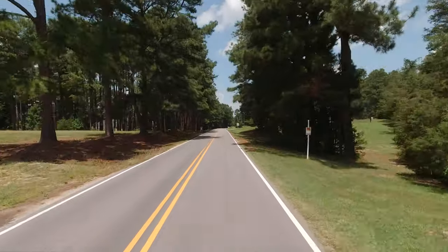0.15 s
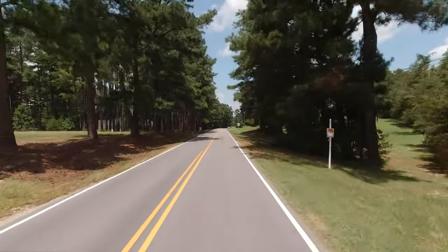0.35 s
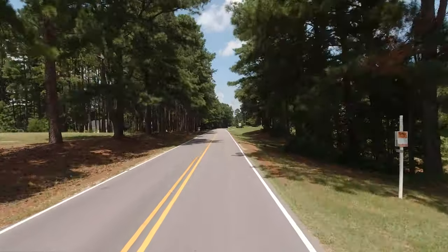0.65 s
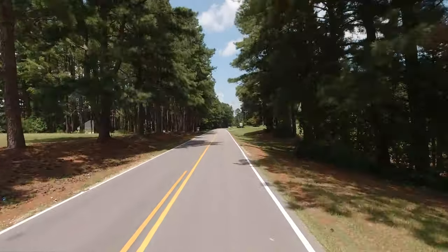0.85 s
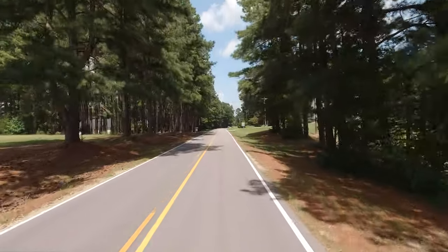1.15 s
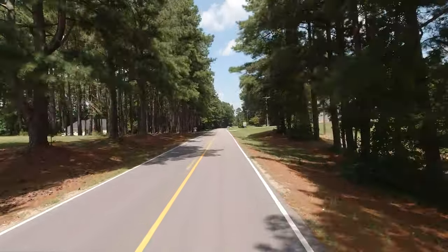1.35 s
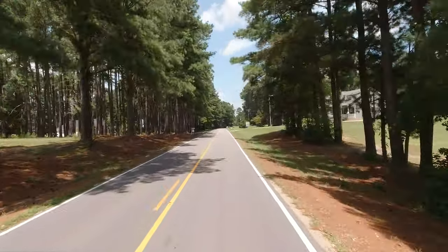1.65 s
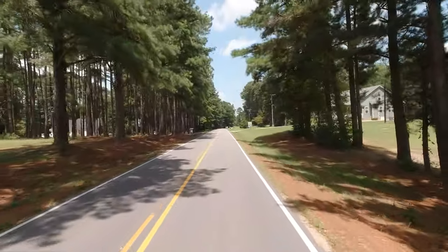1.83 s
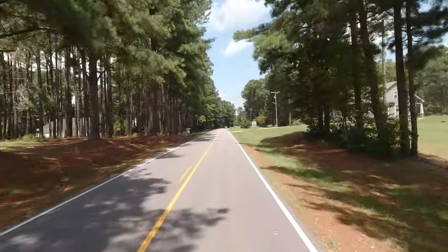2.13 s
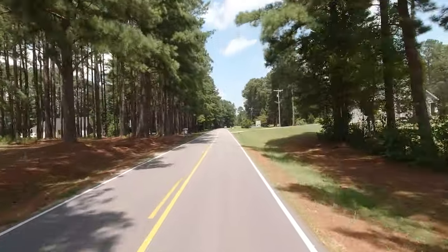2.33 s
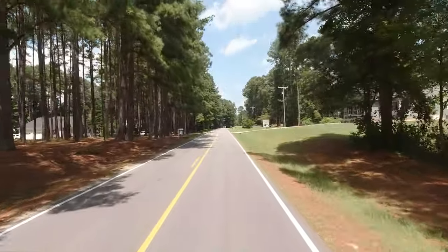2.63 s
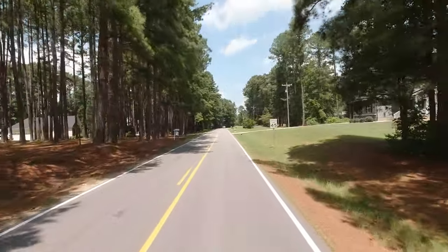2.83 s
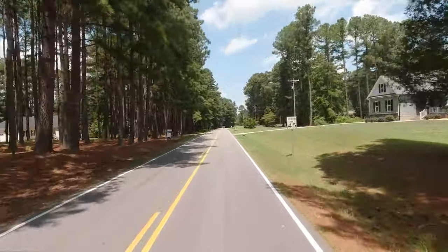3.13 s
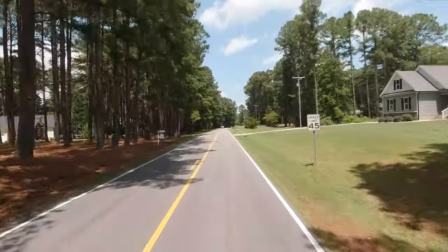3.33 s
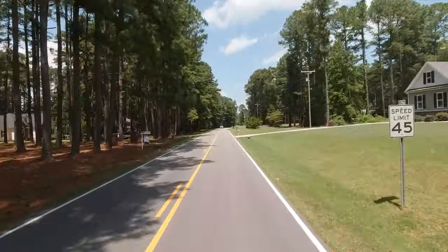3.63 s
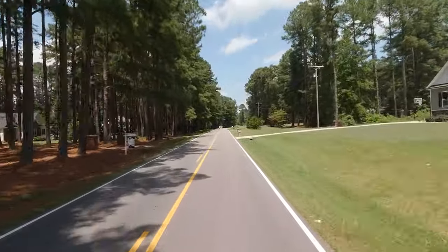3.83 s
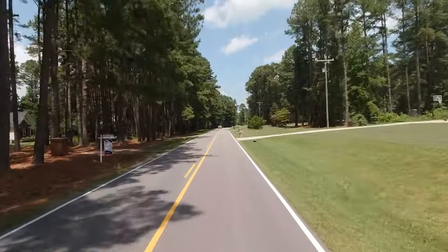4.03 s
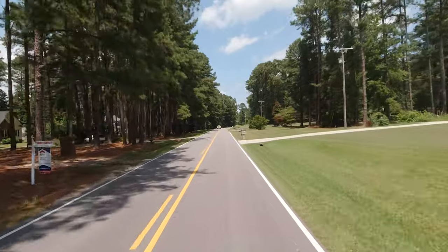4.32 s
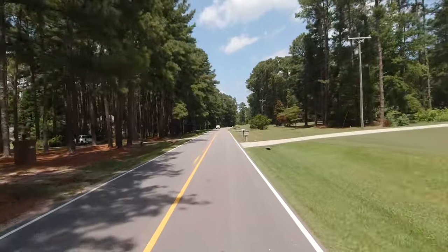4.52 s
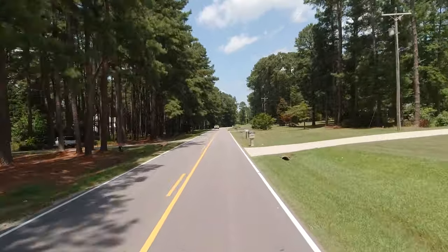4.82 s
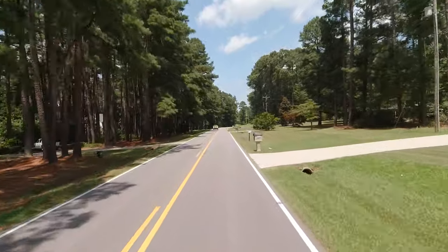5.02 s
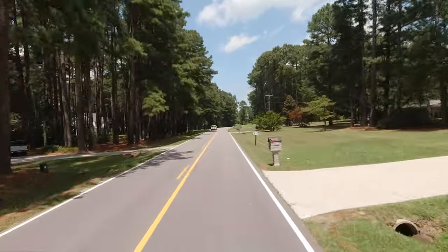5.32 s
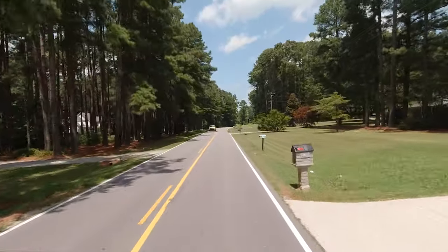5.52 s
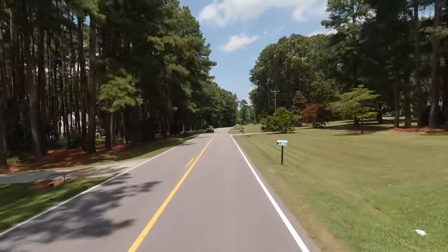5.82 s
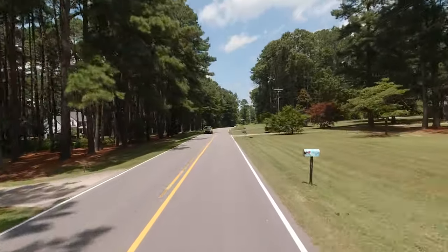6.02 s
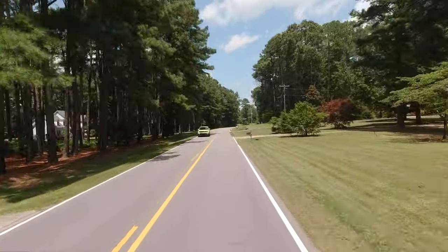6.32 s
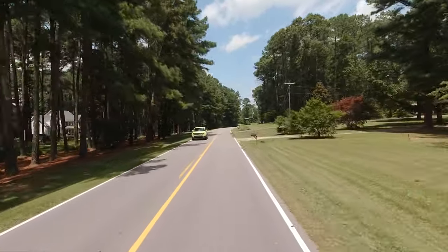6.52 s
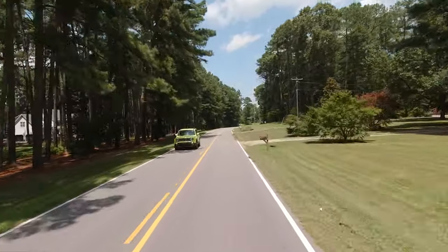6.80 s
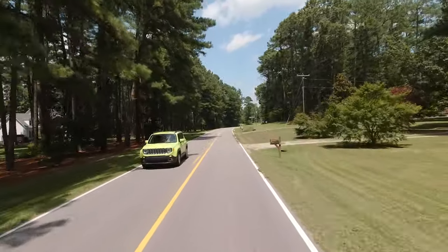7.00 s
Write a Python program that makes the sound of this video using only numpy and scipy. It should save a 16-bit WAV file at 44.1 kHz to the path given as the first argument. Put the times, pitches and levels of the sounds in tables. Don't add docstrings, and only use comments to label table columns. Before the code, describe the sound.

A seven-second stereo take inside a vehicle at steady speed on a country road, windows open. Throughout, the cabin air booms near 40 Hz in irregular throbs, several a second, breaking off and restarting, with heavy rumble from floor, axle and body. Quieter, wide tyre roar, a faint tread hum and thin fluttering wind hiss lie above, with soft drones and muffled knocks from doors and window frames. A dull grit tick lands at 0.6 s, a faint ringing one at 2.1 s, and the clearest at 3.7 s. Very faint high trim squeaks appear around 2.5-2.8 s and 3.7-4 s, mostly right. From about 5 s road and wind noise strengthen slightly; tiny bright ticks come at 5.5 and 6.5 s. In the last second an oncoming car's tyre hiss swells gently, still approaching as the sound ends around 7 s.

```python
import sys
import numpy as np
from scipy import signal
from scipy.fft import rfft, irfft, next_fast_len
from scipy.io import wavfile
from scipy.ndimage import uniform_filter1d, map_coordinates

SR = 44100
rng = np.random.default_rng(int(sys.argv[2]) if len(sys.argv) > 2 else 0)


def unload_wav(signal):
    wavfile.write(
        sys.argv[1],
        SR,
        np.round(np.clip(np.atleast_2d(signal).T, -1, 1) * 32767).astype(np.int16),
    )


def level_to_linear(level):
    exponent = np.asarray(level, float) / 20
    return 10 ** exponent


N = 315756

# (start [s], length [s], pitch [Hz], level [dB])
THROBS = [(-0.13, 0.2695, 37.62, -19.5), (0.24, 0.24, 38.1, -22), (0.429, 0.14, 37.2, -19.5),
          (0.581, 0.13, 40, -27), (0.722, 0.17, 42.97, -21.5), (0.964, 0.11, 39.8, -20.0),
          (1.073, 0.15, 38.7, -17), (1.239, 0.14, 40.3, -17), (1.447, 0.4955, 38.07, -19),
          (2.244, 0.13, 38.56, -16.5), (2.451, 0.2, 41.22, -20), (2.659, 0.15, 43.13, -26.5),
          (3.072, 0.37, 39.42, -20), (3.307, 0.23, 39.13, -18.5), (3.529, 0.22, 40.76, -20),
          (3.751, 0.3, 39.26, -20), (4.03, 0.25, 38.98, -18.5), (4.225, 0.16, 39.86, -15.5),
          (4.363, 0.18, 40.53, -19.5), (4.591, 0.18, 35.68, -23.5), (4.778, 0.23, 37.73, -26.5),
          (5.008, 0.24, 42.48, -21), (5.215, 0.23, 40.88, -24.5), (5.375, 0.12, 37.96, -21),
          (5.51, 0.29, 37.62, -20.5), (5.74, 0.18, 36.9, -17.5), (5.895, 0.056, 37.6, -22.5),
          (6.04, 0.17, 43.04, -25), (6.229, 0.29, 42.93, -27.5), (6.369, 0.32, 40.25, -21),
          (6.574, 0.17, 40.2, -16.5), (6.741, 0.097, 41.6, -17), (6.846, 0.19, 42.6, -26.5),
          (6.96, 0.18, 43.6, -20.5)]
BOOM_BREAKS = [0.213, 0.44, 0.569, 0.705, 0.88, 1.222, 1.349, 1.948, 2.252, 2.413, 2.882, 3.063, 3.54,
               3.755, 4.066, 4.361, 4.794, 5.408, 5.893, 6.027, 6.34, 6.732, 6.83, 7.13]

# (time [s], length [s], level [dB])
BUMPS = [(0.04, 0.071, -29), (0.53, 0.11, -23), (0.84, 0.087, -29.5), (1.53, 0.13, -24),
         (1.91, 0.14, -28.5), (2.21, 0.087, -24), (2.6, 0.088, -29), (2.74, 0.031, -21),
         (3.1, 0.035, -23.5), (3.54, 0.08, -22.5), (3.71, 0.064, -20), (4.02, 0.061, -36),
         (4.32, 0.11, -29), (4.56, 0.11, -31.5), (4.68, 0.045, -21.5), (4.79, 0.045, -34),
         (5.01, 0.26, -26.5), (5.58, .08, -33.5), (5.93, .08, -24.5), (6.17, .08, -21), (6.35, 0.061, -19),
         (6.57, 0.079, -24.5), (6.78, 0.3, -27), (7.0, 0.11, -24)]
# (frequency [Hz], density [dB per Hz])
SHAKE_SPECTRUM = [(25, -40), (40, -14), (46, -3), (50, 1), (54, -2), (58, -6), (64, -11), (80, -40),
                  (160, -120)]
# (time [s], length [s], level [dB])
DIPS = [(0.34, 0.093, -29), (0.49, 0.14, -30), (1.77, 0.12, -32), (4.01, 0.07, -33), (4.24, 0.1, -28),
        (4.69, 0.053, -26), (5.12, 0.14, -34.5), (5.33, 0.1, -24.5), (5.48, 0.079, -24), (5.7, 0.07, -30),
        (6.19, 0.08, -38), (6.36, 0.18, -29.5), (6.93, 0.07, -29), (7.08, 0.071, -30)]
# (frequency [Hz], density [dB per Hz])
HEAVE_SPECTRUM = [(6, -40), (12, -14), (18, -4), (23, -5), (29, -6), (32.5, 1), (35, -6), (50, -45),
                  (100, -120)]
# (time [s], length [s], level [dB])
TAR_PATCHES = [(0.24, 0.092, -30.5), (0.54, 0.037, -30.5), (1.08, 0.14, -30.5), (1.44, 0.15, -32),
               (1.8, 0.17, -32.5), (2.16, 0.25, -27), (2.94, 0.12, -26.5), (3.18, 0.19, -29.5),
               (3.66, 0.39, -29), (3.84, 0.11, -30.5), (4.08, 0.11, -35.5), (4.56, 0.2, -21),
               (4.86, 0.18, -27.5), (5.16, 0.22, -35), (5.58, 0.13, -25), (5.82, 0.16, -23.5),
               (6.36, 0.2, -27.5), (6.66, 0.082, -36.5)]
# (frequency [Hz], density [dB per Hz])
RUMBLE_SPECTRUM = [(35, -40.5), (58, -8.5), (70, -2), (82, 1.5), (95, -1.5), (110, -15), (200, -120)]
# (time [s], length [s], level [dB])
RUTS = [(0.42, 0.066, -33.5), (0.78, 0.16, -29.5), (1.26, 0.28, -30), (1.74, 0.13, -28.5),
        (2.46, 0.28, -32.5), (2.76, 0.1, -28.5), (3.12, 0.16, -28.5), (3.54, 0.26, -30.5),
        (3.72, 0.043, -30), (3.96, 0.13, -26.5), (4.14, 0.055, -29), (4.38, 0.15, -28), (4.98, 0.16, -33.5),
        (5.16, 0.063, -22.5), (5.34, 0.15, -30.5), (5.82, 0.21, -28.5), (6.24, 0.11, -26),
        (6.6, 0.22, -24.5), (6.96, 0.11, -23.5)]
# (frequency [Hz], density [dB per Hz])
AXLE_SPECTRUM = [(50, -120), (88, -18.5), (102, -2.5), (122, -1), (134, -3.5), (150, -18.5), (300, -120)]
# (time [s], length [s], level [dB])
RIDGES = [(0.18, 0.045, -31.5), (0.3, 0.05, -31), (0.6, 0.07, -29.5), (0.78, 0.036, -28),
          (1.08, 0.18, -33.5), (1.74, 0.11, -30), (2.16, 0.09, -30.5), (2.7, 0.13, -35), (3.48, 0.31, -34),
          (3.84, 0.2, -30), (4.44, 0.23, -36), (4.56, 0.1, -28), (4.86, 0.12, -28.5), (5.04, 0.063, -32.5),
          (5.7, 0.3, -27.5), (6.24, 0.06, -27.5), (6.42, 0.076, -31), (6.66, 0.23, -34.5)]
# (frequency [Hz], density [dB per Hz])
PAN_SPECTRUM = [(70, -120), (125, -21.5), (145, -1.5), (168, -0.5), (189, -2.5), (203, -14), (260, -31.5),
                (500, -120)]
# (time [s], level [dB])
COARSENESS = [(0, -33), (0.5, -37.5), (1.5, -33), (1.75, -34.5), (2.0, -38.5), (2.2, -34.5), (3.0, -34.5),
              (3.5, -33), (3.85, -36.5), (4.05, -33), (4.4, -37.5), (5.2, -30.5), (5.5, -33), (5.72, -30),
              (6.0, -29.5), (6.3, -32.5), (6.9, -27), (7.16, -34)]

# (time [s], level [dB])
TYRE_BITE = [(0, -53.5), (.6, -52.5), (.9, -53), (1.8, -51.5), (2.05, -52), (2.4, -52), (2.9, -51.5),
             (3.48, -51), (4.0, -51.5), (4.3, -51), (4.75, -51.5), (5.05, -50.5), (5.25, -50), (5.65, -49),
             (5.85, -50), (6.15, -50), (6.45, -50.5), (7.16, -49)]
# (frequency [Hz], density [dB per Hz])
ROAR_SPECTRUM = [(150, -35), (250, -4), (460, -7), (600, -9.5), (850, -11), (1170, -20), (1700, -15.5),
                 (2400, -26.5), (3500, -31.5), (4200, -36.5), (4600, -37), (5000, -43), (5700, -47.5),
                 (6500, -55), (9000, -87.5)]
# (time [s], strength [dB], left minus right [dB])
WINDOW_AIR = [(0.08, -78, 2.5), (0.19, -80, 1.5), (0.29, -78, 2), (2.11, -78, 2), (3.65, -76, 3),
              (3.73, -76, 3.5), (4.43, -76, 1.5), (4.64, -77, 3.5), (5.27, -75.5, 1.5), (5.34, -73.5, 4),
              (6.2, -73, 1.5), (6.3, -72, 1), (6.38, -74, 3.5), (6.55, -71.5, 2.5), (6.9, -71.5, 0.5),
              (7.08, -74, 3.5)]
# (frequency [Hz], density [dB per Hz])
HISS_SPECTRUM = [(3000, -35), (5000, -4), (6700, -4), (8500, -1.5), (9300, -2), (10500, -6), (11400, -4.5),
                 (12000, -6), (12700, -10), (13700, -11.5), (14300, -14), (15700, -16), (16500, -39.5)]

# (time [s], length [s], level [dB])
SEAMS = [(0.3, 0.1, -41.5), (0.7, 0.16, -44.5), (1.12, 0.069, -48), (1.38, 0.066, -39), (1.76, 0.091, -41),
         (2.1, 0.092, -41), (2.33, 0.059, -42), (2.7, 0.23, -44), (3.05, 0.23, -41), (3.4, 0.12, -46),
         (3.62, 0.074, -35), (4.05, 0.2, -36.5), (4.55, 0.078, -43.5), (4.98, 0.067, -38),
         (5.35, 0.35, -40.5), (5.7, 0.16, -44.5), (6.05, 0.08, -37), (6.3, 0.17, -38), (6.55, 0.16, -37.5),
         (6.8, 0.075, -41.5), (7.03, .1, -40)]
# (frequency [Hz], density [dB per Hz])
DOOR_SPECTRUM = [(150, -40.5), (205, -0.5), (235, -1), (275, -3.5), (300, -11.5), (400, -51), (730, -120)]
# (time [s], length [s], level [dB])
CRACKS = [(0.36, 0.1, -41.5), (1.32, 0.25, -44.5), (1.74, 0.25, -38.5), (2.22, 0.27, -43),
          (2.76, 0.067, -46), (2.94, 0.082, -41.5), (3.12, 0.13, -45.5), (3.54, 0.082, -49),
          (3.78, 0.04, -51), (4.08, 0.22, -39.5), (4.56, 0.095, -41.5), (4.98, 0.27, -48),
          (5.46, 0.18, -36), (5.88, 0.2, -46.5), (6.42, 0.043, -43.5), (6.6, 0.1, -48.5)]
# (frequency [Hz], density [dB per Hz])
FRAME_SPECTRUM = [(150, -120), (260, -17.5), (295, 1), (330, 0.5), (370, -11.5), (430, -25), (730, -120)]

# (frequency [Hz], density [dB per Hz])
TREAD_SPECTRUM = [(440, -59.5), (520, -7.5), (545, 1), (572, -5.5), (680, -50.5), (800, -8.5), (828, -4.5),
                  (855, 0), (885, -3.5), (1200, -69), (1670, -25), (1715, -8.5), (1755, -20.5),
                  (2300, -120)]
# (frequency [Hz], density [dB per Hz])
ONCOMING_SPECTRUM = [(700, -24), (1500, 0.5), (3000, 5.5), (5000, -10), (9000, -22), (13000, -23),
                     (16000, -52.5)]
# (time [s], level [dB], pitch [Hz], decay to -60 dB [cycles])
GRIT = [
    (0.598, -32, 780, 9),
    (2.137, -33, 860, 70),
    (3.6568, -24, 900, 9),
    (5.4645, -41, 2600, 9),
    (6.5401, -38, 3200, 18),
]
# (time [s], half length [s], pitch [Hz], level [dB])
SQUEAKS = [(2.52, .17, 9330, -87), (2.78, .07, 9300, -85), (2.8, .07, 9560, -86), (2.8, .08, 8200, -87),
           (3.72, .09, 8500, -83), (3.79, .13, 8090, -81), (3.74, .08, 9060, -79), (3.9, 0.14, 9140, -80.5),
           (3.74, .08, 8620, -85), (3.73, .05, 7020, -85), (3.89, .08, 7560, -81), (3.93, .08, 8050, -86)]

# (centre [Hz], width [Hz], left gain [dB], right gain [dB])
CABIN_MODES = [(89, 11, -0.5, -1.5), (126, 18, -1, 4.5), (132, 5.4, -1, -4.5), (184, 18, -4.5, -1.5),
               (274, 25, 1.5, -4), (376, 19, -4, 4), (420, 18, -1.5, 1.5), (455, 22, -2, -5.5),
               (560, 25, -5, 1.5), (643, 25, 4.5, -2), (713, 16, 6.5, 1), (930, 25, 1.5, -3.5),
               (450, 170, 2, 0.5), (570, 54, 2.5, 2.5), (630, 24, -4.5, -4.5), (730, 31, -2.5, -3),
               (810, 65, 2, -1.5), (897, 31, -4.5, -5.5), (958, 35, -2, 6.5), (1043, 94, -3.5, 6),
               (1103, 51, 3.5, 2), (1190, 30, -1.5, -4), (1292, 100, 4, 3), (1370, 140, -1.5, -0.5),
               (1442, 37, 3, 5), (1756, 33, 5.5, -6), (1779, 115, -8.5, -7.5), (1828, 80, 4.5, -2)]
# (frequency [Hz], correlation [0..1])
LIKENESS = [(22, 0.69), (40, 0.91), (52, 1), (65, 1), (120, 0.89), (180, 0.83), (250, 0.56), (320, 0.57),
            (480, 0.43), (590, 0.16), (700, 0.37), (870, 0.14), (1200, 0.1), (1550, 0.37), (2500, 0.074),
            (6000, 0.067)]
# (frequency [Hz], lead [radians])
LEFT_LEAD = [(0, 0), (50, .03), (70, .2), (185, .23), (300, .9), (385, 2.4), (760, 3.3), (1120, 4.6),
             (1380, 8.2), (1640, 10.4), (2000, 15.9), (2700, 16.6), (4650, 22)]
# (frequency [Hz], left minus right [dB])
BALANCE = [(35, 0.9), (52, 0), (70, 10.5), (90, -0.5), (115, 5.5), (185, 6.5), (270, -1.5), (330, 1.5),
           (460, 1.5), (700, 1), (1060, 5.5), (1600, 7), (2750, 2), (4400, 5.5), (9000, 3)]


def boom():
    idle_db, idle_hz = -29, 41.03
    stretch, flat_top = 1.14, 0.96
    t = np.arange(N) / SR
    eddies_hz = 1.504 * wobble(16)
    power = level_to_linear(2 * (idle_db + 2.1 * wobble(11)))
    pull = power * idle_hz
    for start, length, hz, db in THROBS:
        phase = np.clip((t - start - length / 2) / (length * stretch), -.5, .5)
        bell = np.abs(np.cos(np.pi * phase)) ** (2 * flat_top)
        throb = level_to_linear(2 * db + 6.5) * bell
        power = power + throb
        pull = pull + hz * throb
    pitch_hz = pull / power + eddies_hz
    level = np.sqrt(power) * level_to_linear(0.68 * wobble(27))
    return level * breaks() * np.cos(2 * np.pi * np.cumsum(pitch_hz) / SR)


def breaks():
    break_s = .014
    until = np.array(BOOM_BREAKS)[:, None] - np.arange(N) / SR
    return np.prod(np.tanh(until / break_s), axis=0)


def body():
    road_db, = curves(COARSENESS)
    swing_db = 0.73 * (road_db - road_db.mean())
    shake = swells(BUMPS, -29.5) * rush(SHAKE_SPECTRUM, steady=1.0)
    heave = level_to_linear(1.5) * swells(DIPS, -32) * rush(HEAVE_SPECTRUM, steady=0.75)
    rumble = level_to_linear(-3.5) * swells(TAR_PATCHES, -30.5 + swing_db) * rush(RUMBLE_SPECTRUM, steady=0.85)
    axle = level_to_linear(-3.0) * swells(RUTS, -32 + swing_db) * rush(AXLE_SPECTRUM, steady=0.31)
    pan = level_to_linear(-3.0) * swells(RIDGES, road_db + 1.5) * rush(PAN_SPECTRUM, steady=0.94)
    return breaks() * (shake + heave) + rumble + axle + pan


def airflow():
    air_db, pan_db = curves(WINDOW_AIR)
    bite_db, = curves(TYRE_BITE)
    roar_db = -43.5 + 0.87 * (bite_db - bite_db.mean())
    lean = level_to_linear(np.outer([.5, -.5], pan_db - pan_db.mean()))
    flutter = wobble(60)
    roar_level = level_to_linear(roar_db + 5.0 + 0.25 * flutter + 0.38 * wobble(25))
    roar = roar_level * patchy(rush(ROAR_SPECTRUM), depth_db=0.22)
    hiss_level = level_to_linear(air_db + 3.5 + 0.84 * flutter + 0.5 * wobble(45))
    hiss = hiss_level * patchy(rush(HISS_SPECTRUM), depth_db=0.5)
    return lean * (roar + hiss)


def panels():
    doors = swells(SEAMS, -42) * rush(DOOR_SPECTRUM, steady=0.51)
    frames = level_to_linear(-3.5) * swells(CRACKS, -46.5) * rush(FRAME_SPECTRUM, steady=0.78)
    return doors + frames


def tread():
    bite_db, = curves(TYRE_BITE)
    hum_db = -48.5 + 0.65 * (bite_db - bite_db.mean()) + 0.8 * wobble(6.7)
    return level_to_linear(hum_db) * rush(TREAD_SPECTRUM, steady=0.6)


def oncoming():
    pass_s, closing_m_per_s, lane_m = 7.58, 40, 4.4
    ahead_m = closing_m_per_s * (pass_s - np.arange(N) / SR)
    distance_m = np.hypot(ahead_m, lane_m)
    return level_to_linear(-45.5) * lane_m / distance_m * rush(ONCOMING_SPECTRUM)


def grit():
    out, t = np.zeros(N), np.arange(SR // 20) / SR
    for start, db, hz, cycles in GRIT:
        decay = level_to_linear(db - 60 * t * hz / cycles)
        attack = 1 - np.exp(-2 * hz * t)
        out[round(start * SR):][:len(t)] += decay * attack * np.sin(2 * np.pi * hz * t)
    return out


def trim():
    t, out = np.arange(N) / SR, np.zeros(N)
    unrest_hz = 15 * wobble(30)
    unrest = 2 * np.pi * np.cumsum(unrest_hz) / SR
    for centre, length, hz, db in SQUEAKS:
        near = np.abs(t - centre) < length
        fade = np.cos(np.pi / 2 * (t[near] - centre) / length)
        out[near] += level_to_linear(db) * np.sin(2 * np.pi * hz * t[near] + unrest[near]) * fade
    return out * level_to_linear([[-8], [3]])


def ports(x):
    m = next_fast_len(N + 8192)
    hz = np.fft.rfftfreq(m, 1 / SR)
    rings_db = np.zeros((2, len(hz)))
    for centre, width, left, right in CABIN_MODES:
        rings_db += np.outer([left, right], 1 / (1 + (2 * (hz - centre) / width) ** 2))
    half = np.array([[.5], [-.5]])
    gain = level_to_linear(rings_db + half * along(BALANCE, hz))
    phase = np.exp(1j * half * np.interp(hz, *np.transpose(LEFT_LEAD)))
    slow_cut = hz ** 2 / np.hypot(hz ** 2, 16.0 ** 2)
    padded = np.pad(x, [(0, 0), (4096, 4096)], 'reflect')
    return irfft(rfft(padded, m) * gain * phase * slow_cut, m)[:, 4096:][:, :N]


def rush(spectrum, steady=0):
    m = next_fast_len(N)
    hz = np.fft.rfftfreq(m, 1 / SR)
    turn = np.arccos(np.clip(along(LIKENESS, hz), 0, 1)) / 2
    noise = rfft(rng.standard_normal((2, m))) * level_to_linear(along(spectrum, hz))
    mid, side = noise * [np.cos(turn), np.sin(turn)]
    out = irfft([mid + side, mid - side], m)[:, :N]
    swell = uniform_filter1d(np.sum(out ** 2, axis=0), size=SR // 16)
    return unit(out / np.abs(swell + 1e-20) ** (steady / 2))


def patchy(x, depth_db):
    z = signal.stft(x, nperseg=512)[2]
    field = rng.standard_normal(z.shape[1:])
    field = uniform_filter1d(field, size=6, axis=0)
    field = uniform_filter1d(field, size=14, axis=1)
    return signal.istft(z * level_to_linear(depth_db * unit(field)), nperseg=512)[1][:, :N]


def swells(rows, base_db):
    t = np.arange(N) / SR
    power = level_to_linear(2 * base_db)
    for centre, width, db in rows:
        power = power + level_to_linear(2 * db) * np.exp(-np.log(16) * ((t - centre) / width) ** 2)
    return np.sqrt(power)


def wobble(rate):
    knots = rng.standard_normal(int(N * rate / SR) + 4)
    return map_coordinates(knots, [np.arange(N) * rate / SR])


def curves(rows):
    s, *cols = np.transpose(rows)
    t = np.arange(N) / SR
    return [uniform_filter1d(np.interp(t, s, c), size=SR // 80) for c in cols]


def along(points, hz):
    f, v = np.transpose(points)
    return np.interp(np.log(hz + 1), np.log(f + 1), v)


def unit(x):
    return x / np.sqrt(np.mean(x ** 2) + 1e-20)


def scene():
    cabin = boom() + body() + airflow() + tread() + oncoming() + panels()
    return ports(cabin) + trim() + grit()


def band_limit(x):
    return signal.sosfilt(signal.butter(12, 15735, fs=SR, output="sos"), x)


def record(dry):
    return band_limit(dry)


dry = scene()
out = record(dry)
unload_wav(out)
```